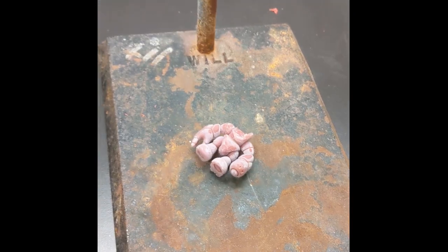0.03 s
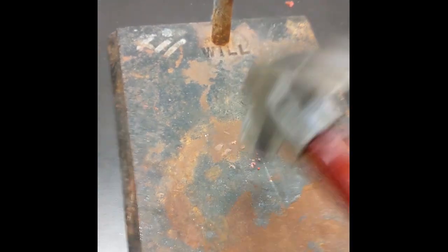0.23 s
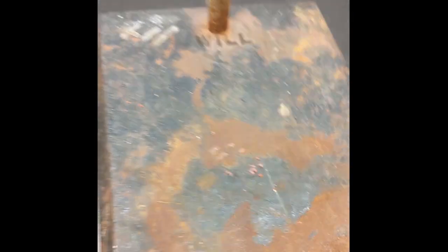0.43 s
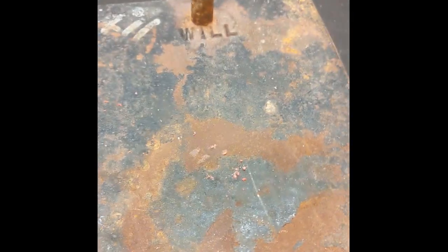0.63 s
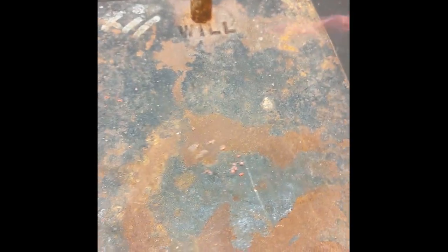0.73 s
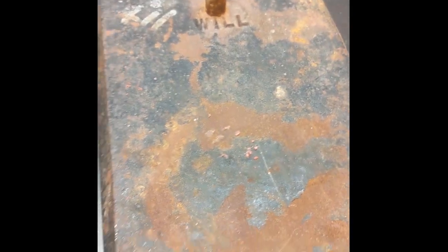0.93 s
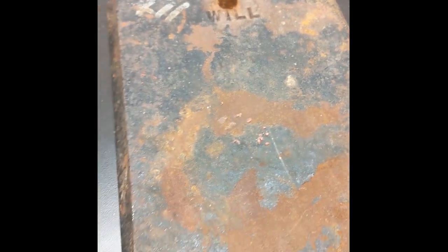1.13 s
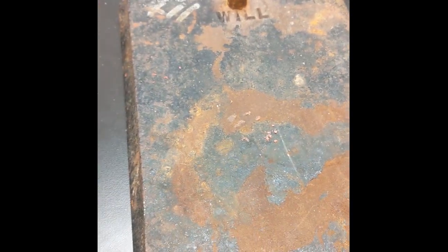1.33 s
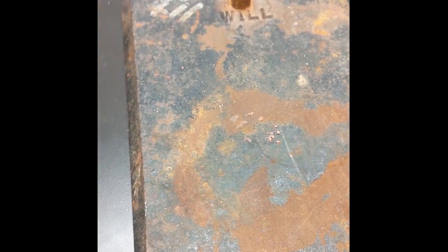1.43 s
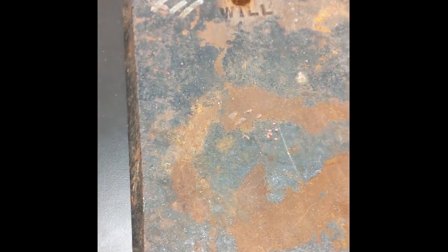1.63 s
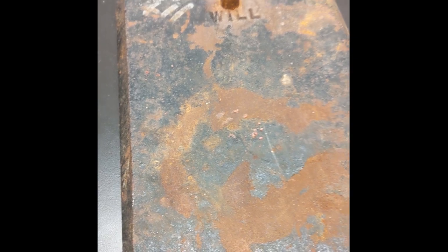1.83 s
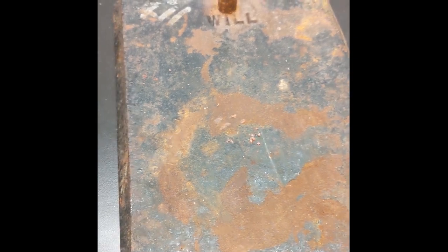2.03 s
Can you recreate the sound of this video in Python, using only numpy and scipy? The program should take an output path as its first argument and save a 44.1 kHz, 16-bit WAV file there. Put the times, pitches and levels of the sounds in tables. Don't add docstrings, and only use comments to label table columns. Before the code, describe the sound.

A hammer shatters a small frozen object on a steel plate with a harsh, distorted crack and short metallic ring; shards clatter off nearby metal, then tick and skid across the floor in a reverberant workshop, close phone microphone.

```python
import sys
import numpy as np
from scipy import signal
from scipy.fft import rfft, irfft
from scipy.io import wavfile
from scipy.ndimage import uniform_filter1d

SR = 44100
rng = np.random.default_rng(int(sys.argv[2]) if len(sys.argv) > 2 else 0)


def int16_out(signal):
    q = np.round(np.clip(np.atleast_2d(signal).T, -1, 1) * 32767)
    wavfile.write(sys.argv[1], SR, q.astype(np.int16))


def convert_level_to_amplitude(level_db):
    exponent = np.asarray(level_db, float) / 20
    return 10 ** exponent


N = 92610
SIDES = np.array([[1], [-1]])


def read(points, hz):
    point_hz, value = np.transpose(points)
    return np.interp(np.log(hz + 1), np.log(point_hz + 1), value)


def evened(x):
    return x / np.sqrt(np.mean(x ** 2) + 1e-20)


def add(mix, start_s, sound):
    part = mix[:, round(start_s * SR):][:, :sound.shape[1]]
    part += sound[:, :part.shape[1]]


def coloured(x, db_of_hz):
    hz = np.fft.rfftfreq(x.shape[-1], 1 / SR)
    return evened(irfft(rfft(x) * convert_level_to_amplitude(db_of_hz(hz)), x.shape[-1]))


# freq_hz, density_db [dB per Hz]
AIR_TONE = [(12, -67), (20, -5), (81, -5), (255, -16.5), (367, -9), (422, -16), (1220, -24.5),
            (1610, -24.5), (16000, -51.5)]
# freq_hz, width_hz, gain_db
DUCT_NOTES = [(88, 33, 9), (213.6, 26, 12.5), (358.7, 15, 10), (720.7, 20, 16), (1234, 130, 8)]
# freq_hz, correlation
AIR_LIKENESS = [(60, 0.97), (240, 0.99), (950, -0.048), (3770, 0.1), (15000, -1.6)]
# freq_hz, balance_db
AIR_BALANCE = [(60, 2.5), (240, -2), (950, -1), (3770, -3), (15000, -5)]
# centre_s, length_s, gain_db
DUCT_SWELLS = [
    (1.478, 0.091, 12),
    (2.03, 0.052, 14.5),
    (0.24, 0.049, 3.5),
]
AIR_DB = -40


def air():
    frames, hz = N // 512 + 5, np.fft.rfftfreq(2048, 1 / SR)
    a, b, c, d, patches = rng.standard_normal((frames, 1025, 5)).T
    patches = uniform_filter1d(patches, size=8, axis=0)
    patches = evened(uniform_filter1d(patches, size=5, axis=1))
    patch_db = (2.0 + 1.35 / (1 + (hz / 300) ** 2))[:, None] * patches

    tone_db = read(AIR_TONE, hz)
    for freq_hz, width_hz, gain_db in DUCT_NOTES:
        tone_db = tone_db + gain_db / (1 + (2 * (hz - freq_hz) / width_hz) ** 2)
    balance_db = np.multiply.outer([.5, -.5], read(AIR_BALANCE, hz))[..., None]

    same = np.clip(read(AIR_LIKENESS, hz), -1, 1)[:, None]
    left = a + 1j * b
    right = same * left + np.sqrt(1 - same ** 2) * (c + 1j * d)
    z = np.array([left, right]) * convert_level_to_amplitude(tone_db[:, None] + patch_db + balance_db)

    t = np.arange(frames) * 512 / SR
    swell_db = sum(db * np.exp(-((t - s) / length_s) ** 2) for s, length_s, db in DUCT_SWELLS)
    near_note = np.exp(-((hz - DUCT_NOTES[1][0]) / 35) ** 2)
    z *= convert_level_to_amplitude(np.outer(near_note, swell_db))
    return convert_level_to_amplitude(AIR_DB) * evened(signal.istft(z, nperseg=2048, noverlap=1536)[1][:, :N])


APART = 1.7


def crack(level_db, hold_s, pan_db, rise_s, colour, grit_db=4):
    t = np.arange(4096) / SR
    noise = rng.standard_normal((3, 4096))
    grit = convert_level_to_amplitude(grit_db * evened(uniform_filter1d(rng.standard_normal(4096), size=40)))
    spray = coloured((noise[0] + APART * noise[1:]) * grit, colour)
    fall = convert_level_to_amplitude(-5 * t / hold_s - 2300 * np.maximum(t - hold_s, 0))
    return convert_level_to_amplitude(level_db - 1.5 + pan_db / 2 * SIDES) * spray * np.minimum(t / rise_s, 1) * fall


def band(centre_hz, spread_oct):
    return lambda hz: np.maximum(-6 * (np.log2((hz + 20) / centre_hz) / spread_oct) ** 2, -45)


# start_s, level_db, centre_hz, spread_oct
BRITTLE_SNAPS = [(.011, -50, 12000, 0.69), (.031, -65, 13900, 0.54), (.058, -63, 11900, 0.88),
                 (.085, -44, 9000, 1.2), (.098, -49.5, 12300, .5), (.118, -64, 10000, .7),
                 (.133, -51, 8000, 1.1), (.138, -55, 11970, 0.39), (.150, -47, 9600, 0.19),
                 (.154, -45, 13900, .4), (.159, -50, 12470, .7), (.163, -47, 12000, 0.35),
                 (.169, -42, 10000, 1.3), (.175, -56.5, 8760, 0.94), (.179, -38, 14000, .5),
                 (.201, -42, 13500, 0.64), (.205, -52, 12000, .5), (.212, -45.5, 7000, 1.3),
                 (.219, -45.5, 11500, .6), (.229, -41.5, 9000, 1.4), (.237, -41, 12000, .7),
                 (.297, -8.5, 2600, 0.49), (0.302, -16, 3000, 0.69), (0.311, -15, 2000, .8),
                 (.325, -14.5, 2800, 0.59), (0.344, -23, 2500, 1.1), (0.401, -7, 2950, 0.41),
                 (0.419, -26, 604, 0.68), (0.924, -27.5, 2000, 0.96), (1.065, -46, 13500, 0.34),
                 (1.176, -27, 11000, 0.5), (1.671, -34, 3500, .5), (.5115, -31, 2960, 1.1),
                 (1.494, -40, 6000, 1.3), (1.5396, -32.5, 3700, 0.37), (1.6135, -35, 3860, 0.53),
                 (1.6873, -40, 6020, 2), (1.7102, -27, 7000, 1.8)]
SNAP_S = .0012


def snaps():
    out = np.zeros((2, N))
    fade = np.exp(-np.arange(4096) / (SR * SNAP_S))
    for start_s, level_db, centre_hz, spread_oct in BRITTLE_SNAPS:
        snap = crack(level_db, SNAP_S, 0, SNAP_S / 4, band(centre_hz, spread_oct))
        add(out, start_s, snap * fade)
    return out


# start_s, level_db, crumble_s, tilt_db_per_oct, pan_db [left-right]
CLOSE_HITS = [
    (0.2451, 3.5, 0.002, -1, -7),
    (0.2491, 1, 0.0014, -5.5, 29),
    (.253, -10.5, 0.035, -7.5, -0.5),
    (0.285, -14, 0.021, -5.5, 1),
    (0.336, -15.5, 0.0068, -9, 7.5),
    (0.379, -8.5, 0.011, -4, 4.5),
    (0.393, -10, 0.006, -1, 0.5),
    (.444, -5.5, 0.006, -4.5, 3.5),
    (.639, -11.5, 0.0074, -2, 7),
    (.648, -8, 0.0082, -2, 2.5),
]
BASS_CUT_HZ, BASS_CUT_DB_PER_OCT = 1600, 9


def close_impacts():
    out = np.zeros((2, N))
    for start_s, level_db, crumble_s, tilt_db, pan_db in CLOSE_HITS:
        def colour(hz):
            bass_cut_db = BASS_CUT_DB_PER_OCT * np.maximum(np.log2(BASS_CUT_HZ / (hz + 20)), 0)
            return tilt_db * np.log2(hz / 3000 + 0.02) - bass_cut_db
        add(out, start_s, crack(level_db, crumble_s, pan_db, 0.00077, colour))
    return out


SHARE_DB, DAMP_S = 4, .006


def ring(modes, rise_s, rattle_db, free_s, damped_db):
    t = np.arange(SR // 2) / SR
    draws = rng.random((14, 3))
    shakes = uniform_filter1d(rng.standard_normal((14, 2, len(t))), size=300)
    shakes = uniform_filter1d(shakes, size=300)
    out = np.zeros((2, len(t)))
    for (freq_hz, level_db, t60_s), (phase, offset, share), shake in zip(modes, draws, shakes):
        db = level_db - 60 * t / t60_s + rattle_db * evened(shake[0])
        db = db + SHARE_DB * (share - 1.0) * SIDES
        turns = freq_hz * t + 0.034 * rattle_db * evened(shake[1])
        turns = turns + np.array([[phase], [phase + 0.58 * (offset - .5)]])
        out += convert_level_to_amplitude(db) * np.sin(2 * np.pi * turns)
    damping = convert_level_to_amplitude(damped_db * np.clip((t - free_s) / DAMP_S, 0, 1))
    return out * (1 - np.exp(-t / rise_s)) * damping


# freq_hz, level_db, t60_s
PLATE_MODES = [(1350, -15, .19), (1388, -6, .5), (1950, -9, .16), (1992, -5.5, 0.11), (2679, -4, 0.11),
               (2793, -4.5, 0.22), (2937, -11.5, 0.24), (2990, -14, 0.31), (3440, -19, .5), (4533, -18, .4),
               (5280, -2.5, 0.074), (7666, -31.5, 0.054), (10470, -17, .08), (292.6, -23.5, 0.6)]
# freq_hz, level_db, t60_s
PANEL_MODES = [(299, -17, .22), (604, -19, .06), (3400, -23, .052), (2450, -20, .06), (2046, -17, .1),
               (1071, -23, .05), (250, -22, .06)]
SHEET_MODES = [(1796, -8, 0.055), (2084, -14, 0.082), (3290, -28, 0.32), (2177, -10, 0.14),
               (4970, -9.5, 0.039), (2300, -21, 0.09), (3190, -28, 0.47), (1980, -19, 0.14)]
CABINET_MODES = [(350.5, -17.5, .14), (1232, -17.5, 0.06), (1708, -16, 0.11), (2093, -17, 0.1),
                 (2830, -16.5, 0.052), (3220, -16, 0.08), (4810, -8, 0.059), (5890, -17, 0.12)]
PIN_MODES = [(10050, -40, .33), (13150, -43, .6)]
ROD_MODES = [(3550, -46, .17), (4425, -41, .45), (4770, -41, .4), (4900, -43, .3), (7095, -38, .4),
             (8040, -51, .25), (11120, -41, .2), (14330, -43, .14), (4620, -43, .4), (8974, -49, .25),
             (9744, -48, .25), (12680, -47, .13), (7030, -42, .15), (7160, -45, .3)]
# start_s, rise_s, rattle_db, free_s [until damped], damped_db
STRIKES = [
    (.251, .004, 1.5, .038, -19),
    (.381, .003, 2, .12, -12),
    (.4435, .002, 2, .04, -10),
    (.641, .0035, 1.5, .034, -8),
    (.684, .0016, 2.5, .125, -20),
    (1.716, .004, 1.8, .095, -7),
]
# start_s, freq_hz, level_db, t60_s
DULL_THUMPS = [
    (.2463, 112, -8.5, .065),
    (.247, 392, -12.5, .032),
    (.380, 620, -22, .03),
    (.511, 200, -32, .03),
    (.640, 150, -25, .07),
]


def clangs():
    out, t = np.zeros((2, N)), np.arange(8000) / SR
    objects = (PLATE_MODES, PANEL_MODES, SHEET_MODES, CABINET_MODES, PIN_MODES, ROD_MODES)
    for modes, (start_s, *touch) in zip(objects, STRIKES):
        add(out, start_s, ring(modes, *touch))
    for start_s, freq_hz, level_db, t60_s in DULL_THUMPS:
        push = np.sin(2 * np.pi * freq_hz * t / (1 + 12 * t))
        add(out, start_s, convert_level_to_amplitude(level_db - 60 * t / t60_s + 2 * SIDES) * push)
    return out


# start_s, level_db, crumble_s, centre_hz, spread_oct
SHARD_LANDINGS = [(1.112, -24, 0.0035, 12700, 0.95), (1.168, -16.5, 0.009, 10200, 0.57),
                  (1.741, -30, 0.0064, 8800, 1.6), (.509, -30, 0.0067, 4400, 2),
                  (0.566, -41.5, 0.0037, 10300, 2.1), (0.842, -43, 0.0082, 11900, 0.93),
                  (0.914, -37, .008, 13000, 0.54), (0.92, -33.5, 0.0015, 3330, 1.6),
                  (1.056, -34, 0.002, 9100, 2.3), (1.103, -32.5, 0.0087, 12800, 0.4),
                  (1.113, -33, 0.026, 13000, 1.34), (1.147, -31, .012, 3000, .6),
                  (1.152, -22, .013, 11000, .9), (1.372, -39.5, 0.027, 5950, .3),
                  (1.375, -48, 0.02, 11900, 0.25), (1.635, -35.5, 0.0079, 13800, 0.61),
                  (1.682, -34, 0.0041, 3460, 0.45), (1.71, -33, 0.0039, 3440, 0.6),
                  (1.717, -32, 0.012, 8800, 1.8), (1.86, -34, 0.0022, 13100, 0.77),
                  (2.004, -56, 0.016, 12800, 0.39), (2.028, -51, 0.0038, 5400, 0.31),
                  (2.037, -44.5, 0.0014, 12400, 0.45), (2.06, -53, 0.014, 6900, 1.3)]
FAR_RISE = .3


def landings():
    out = np.zeros((2, N))
    for start_s, level_db, crumble_s, centre_hz, spread_oct in SHARD_LANDINGS:
        add(out, start_s, crack(level_db, crumble_s, 0, FAR_RISE * crumble_s, band(centre_hz, spread_oct)))
    return out


# time_s, level_db
SKID_LEVEL = [(1.4, -57.5), (1.5, -47.5), (1.56, -47), (1.63, -45.5), (1.7, -45.5), (1.76, -51.5),
              (1.85, -54), (1.95, -74)]
# freq_hz, gain_db
SKID_COLOUR = [(1000, -16), (2200, -21.5), (3800, -13), (6000, -22), (9000, -22.5), (14000, -18)]
SLIP_DB = 2


def skid():
    slips = rng.standard_normal((2, N)) * convert_level_to_amplitude(SLIP_DB * np.minimum(rng.exponential(1, N), 5))
    flicker = evened(uniform_filter1d(rng.standard_normal(N), size=500))
    level_db = np.interp(np.arange(N) / SR, *np.transpose(SKID_LEVEL), left=-120, right=-120)
    return coloured(slips, lambda hz: read(SKID_COLOUR, hz)) * convert_level_to_amplitude(level_db + 1.8 * flicker)


def tail(t60_of_hz, gap):
    taps = np.zeros((2, SR))
    slots = np.arange(gap, SR - 20, 20)
    at = slots + rng.integers(0, 20, (2, len(slots)))
    np.put_along_axis(taps, at, rng.choice([-1., 1.], at.shape), 1)
    hz, t, z = signal.stft(taps, SR, nperseg=256)
    out = signal.istft(z * convert_level_to_amplitude(-60 * t / t60_of_hz(hz)[:, None]), SR, nperseg=256)[1]
    return out / np.linalg.norm(out[0])


# freq_hz, t60_s
ROOM_T60 = [(200, 0.61), (1000, 0.5), (3000, 0.63), (7000, 0.44), (14000, 0.33)]
NEAR_DB, NEAR_T60_S, ROOM_DB = -7, 0.096, -12.5


def workshop():
    near = tail(lambda hz: NEAR_T60_S + 0 * hz, gap=100)
    return convert_level_to_amplitude(NEAR_DB) * near + convert_level_to_amplitude(ROOM_DB) * tail(lambda hz: read(ROOM_T60, hz), gap=500)


# freq_hz, balance_db [left-right]
PORT_BALANCE = [(60, -15), (150, 15.5), (380, 4.5), (950, -3.5), (2380, -6), (5980, 5), (15000, -7.5)]


def ports(x):
    balance_db = read(PORT_BALANCE, np.fft.rfftfreq(N, 1 / SR))
    return irfft(rfft(x) * convert_level_to_amplitude(SIDES / 2 * balance_db), N)


FAR_WET_DB, RING_WET_DB = 8.5, -9


def scene():
    close = close_impacts()
    far = landings()
    rung = clangs()
    far = far + skid()
    space = workshop()
    draught = air()
    far = far + snaps()
    sent = close + convert_level_to_amplitude(FAR_WET_DB) * far + convert_level_to_amplitude(RING_WET_DB) * rung
    wet = signal.fftconvolve(sent, space, axes=1)[:, :N]
    return ports(close + far + wet) + rung + draught


def top_cut(x):
    return signal.sosfilt(signal.butter(12, 16990, fs=SR, output="sos"), x)


CEILING, EDGE_HZ = 0.62, 15600
END_S, END_DB = 2.085, -45


def record(dry):
    x = CEILING * np.tanh(dry / CEILING)
    lowpass = signal.firwin(255, EDGE_HZ, window=("kaiser", 8), fs=SR)
    x = signal.oaconvolve(x, lowpass[None], "same")
    x = x * np.where(np.arange(N) < END_S * SR, 1, convert_level_to_amplitude(END_DB))
    return top_cut(x)


dry = scene()
out = record(dry)
int16_out(out)
```